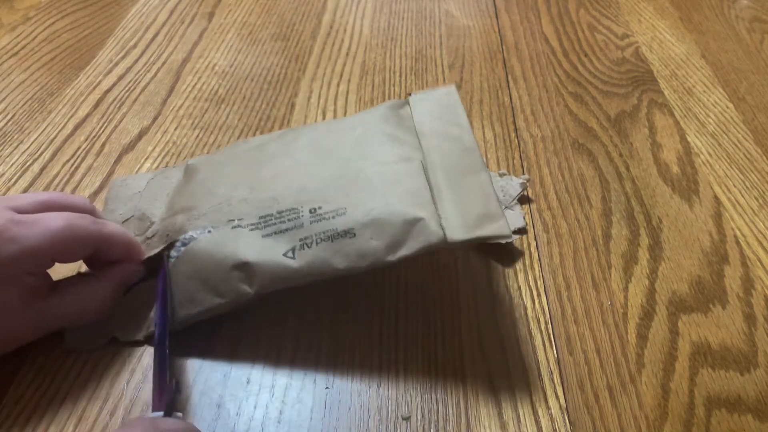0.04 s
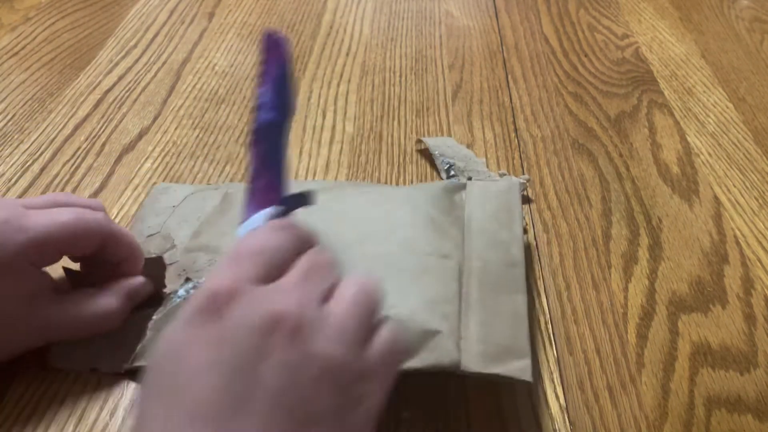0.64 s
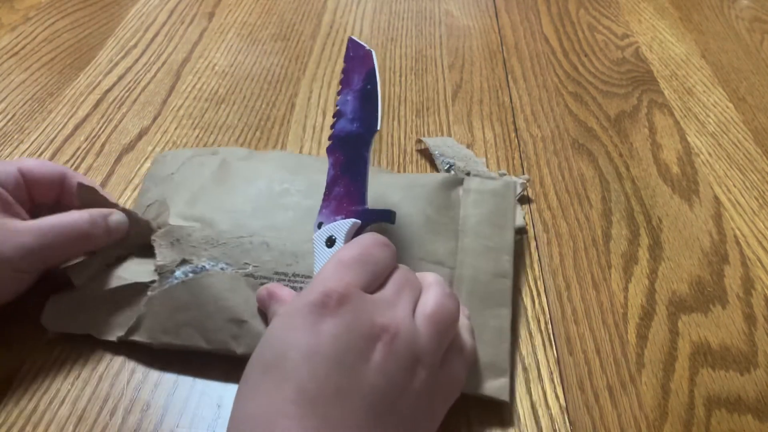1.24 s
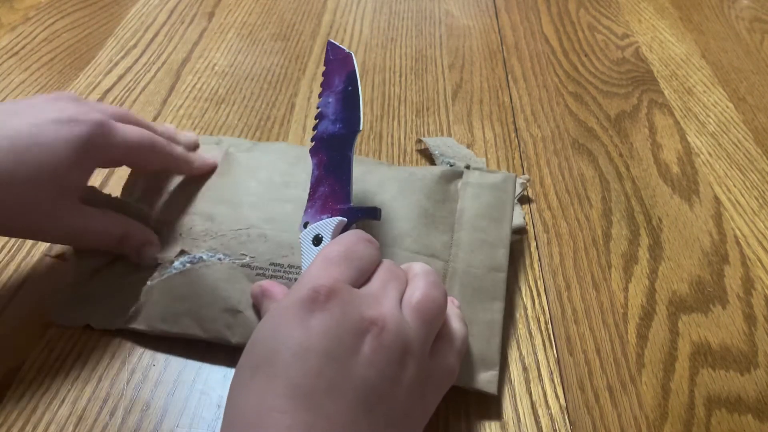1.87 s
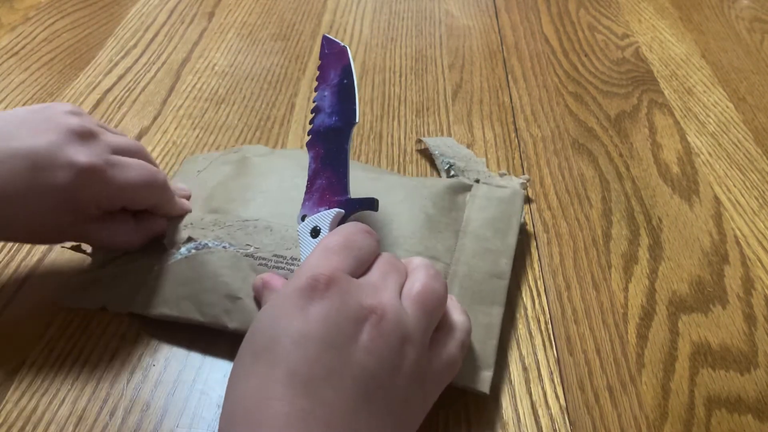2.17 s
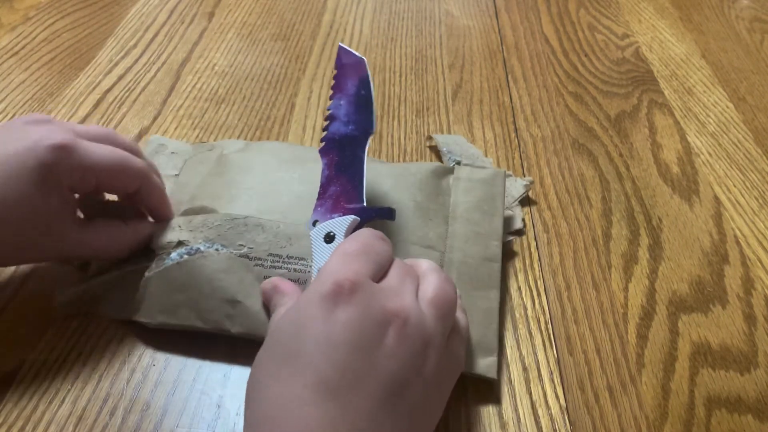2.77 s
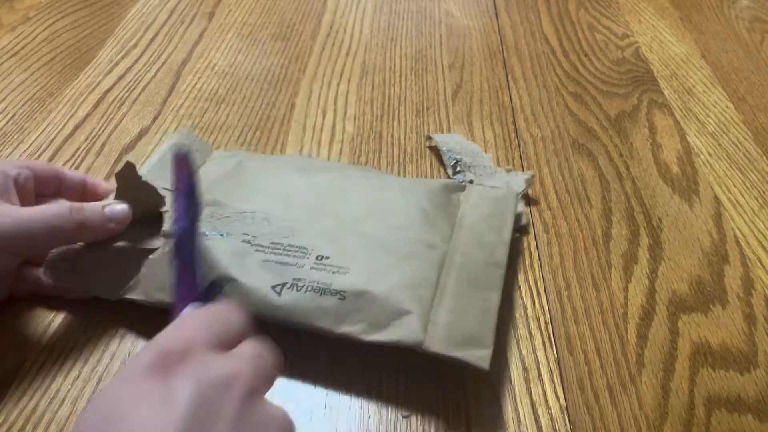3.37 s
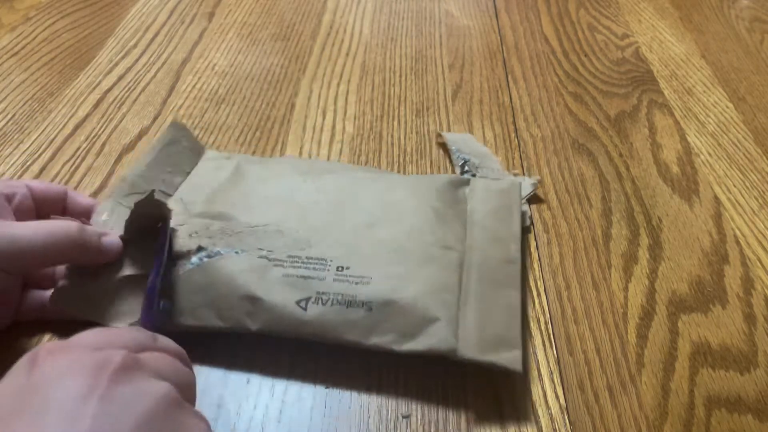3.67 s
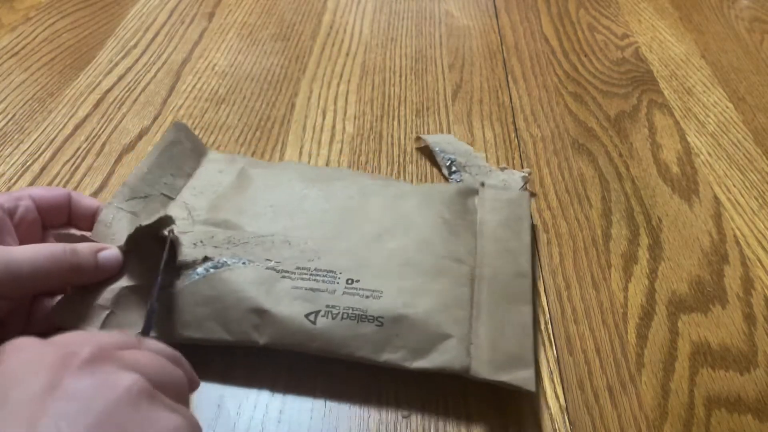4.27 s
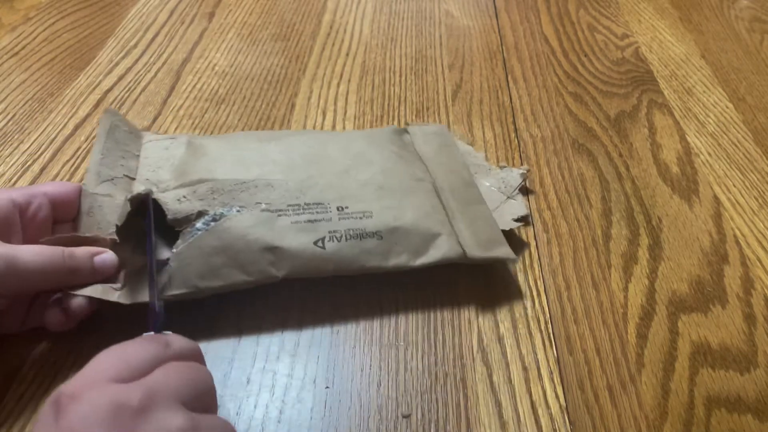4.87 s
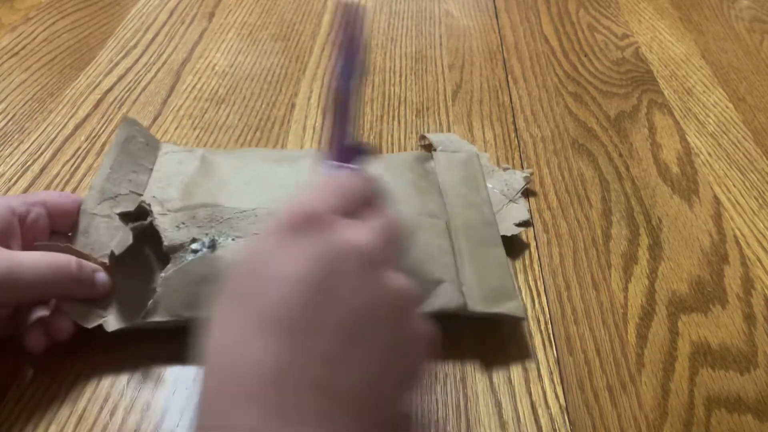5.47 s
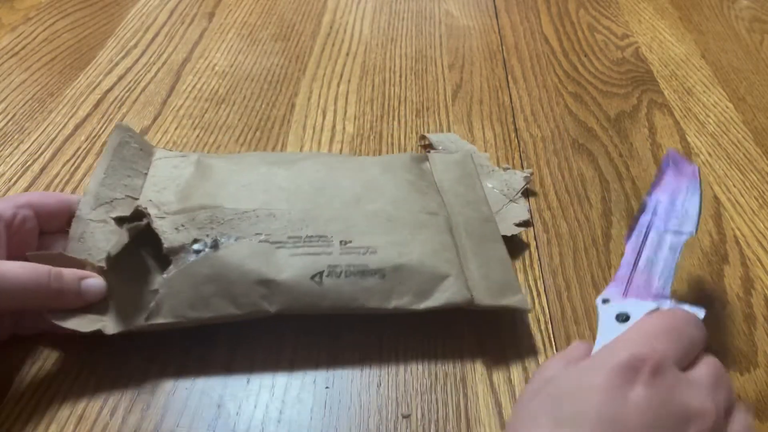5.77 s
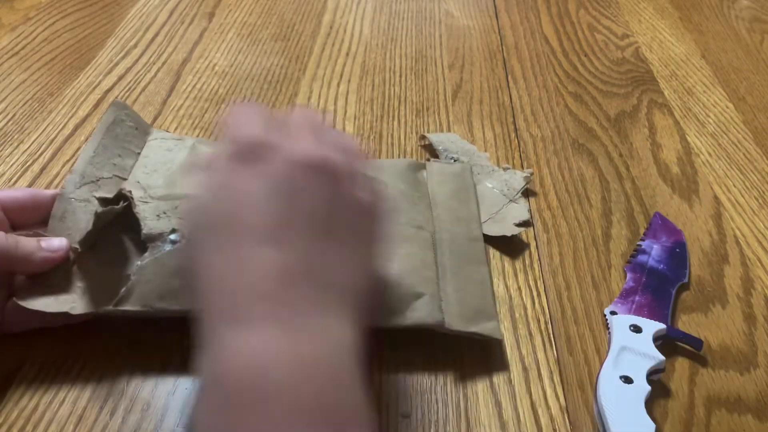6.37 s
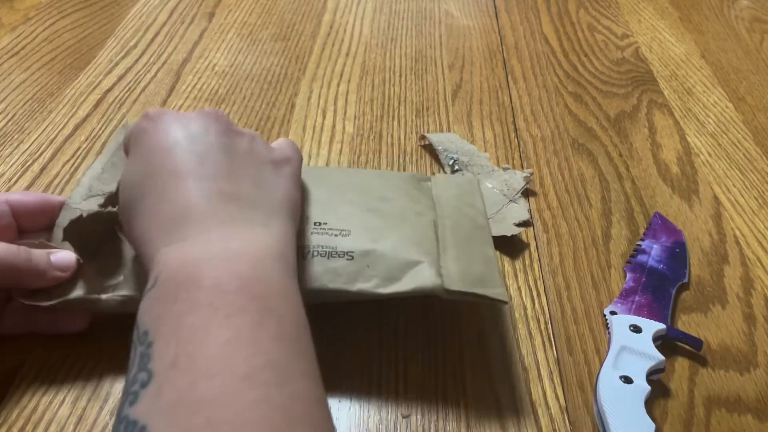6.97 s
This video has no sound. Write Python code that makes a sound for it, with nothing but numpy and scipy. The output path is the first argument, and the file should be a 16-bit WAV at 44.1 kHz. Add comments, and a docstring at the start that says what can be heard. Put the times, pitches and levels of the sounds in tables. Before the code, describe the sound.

Close up in a small room, a padded paper envelope is cut open on a wooden table. A loud, short rip comes first, then several seconds of softer crinkling, sliding and tugging with a few dull bumps. The paper rips sharply again. A steel knife knocks and clinks down onto the wood, and light crinkling resumes. A faint low hum runs underneath.

```python
"""A padded paper mailer is cut open and handled on a wooden table, close up in a small room.
A knife rips its corner and fingers rub and tug at it: fibres hiss and break, the sheet flexes,
and stiff creases buckle with little falling pops. The knife is then laid down with a clatter
that rings the wood and the steel, and the hands return to the paper. A low hum runs throughout."""
import sys
import numpy as np
from scipy import signal
from scipy.fft import rfft, irfft
from scipy.io import wavfile
from scipy.ndimage import uniform_filter1d

SR = 44100
rng = np.random.default_rng(int(sys.argv[2]) if len(sys.argv) > 2 else 0)


def master_out(mix):
    """Clip the mix to full scale and print it as 16-bit PCM to the path in sys.argv[1]."""
    frames = np.transpose(np.atleast_2d(mix))
    ceiling = np.clip(frames, -1, 1)
    pcm = np.round(ceiling * 32767).astype(np.int16)
    wavfile.write(sys.argv[1], SR, pcm)


N = 317961

# The papery body of the flexing sheet. Each row: frequency in Hz, relative level in dB.
FLEX_SPECTRUM = [(40, -9), (120, 0), (280, -0.5), (540, 2), (900, -3.5), (1200, 0.5), (1500, -2.5),
                 (1750, -11), (2450, -8.5), (3200, -20), (6000, -50.5)]
# The bright crack of snapping fibres. Each row: frequency in Hz, relative level in dB.
CRACK_SPECTRUM = [(300, -9), (1300, -2.5), (5000, 2), (12000, -9.5)]


def gain_of(db):
    """Decibels to amplitude."""
    return 10 ** (np.asarray(db) / 20)


def unit_rms(x):
    """Scales a signal to rms 1."""
    return x / np.sqrt(np.mean(x ** 2) + 1e-20)


def curve_at(points, hz):
    """Joins a table's points by straight lines over log frequency."""
    point_hz, value = np.transpose(points)
    return np.interp(np.log(hz + 1), np.log(point_hz + 1), value)


def add(mix, start_s, sound):
    """Drops a sound into the mix at its start time."""
    part = mix[..., max(round(start_s * SR), 0):][..., :sound.shape[-1]]
    part += sound[..., :part.shape[-1]]


def colour(x, spectrum, size=2048):
    """Causal filter with the given spectral shape and unit energy."""
    log_gain = np.log(gain_of(curve_at(spectrum, abs(np.fft.fftfreq(size, 1 / SR)))))
    taps = np.fft.ifft(np.exp(np.conj(signal.hilbert(log_gain)))).real
    return signal.oaconvolve(x, taps[None] / np.linalg.norm(taps), axes=1)[:, :x.shape[1]]


def burst(t60, size=4096):
    """Noise for each microphone port, starting at rms 1 and falling 60 dB in t60 seconds."""
    return rng.standard_normal((2, size)) * gain_of(-60 * np.arange(size) / SR / t60)


def ring(modes, lag_rad=0, softness_db=0):
    """A struck object's modes lead at alternate ports; a soft blow barely wakes the high ones."""
    t, lag = np.arange(SR) / SR, np.array([[lag_rad], [-lag_rad]])
    out = np.zeros((2, SR))
    for k, (hz, db, t60) in enumerate(modes):
        decay = gain_of(db - softness_db * np.sqrt(hz / 1000) - 60 * t / t60)
        out += decay * np.sin(2 * np.pi * hz * t + (-1) ** k * lag)
    return out


def drift(per_s):
    """Smooth random wandering of rms 1."""
    knots = rng.standard_normal(N)
    return unit_rms(np.interp(np.arange(N) * per_s / SR, np.arange(N), knots))


def grains(per_s, spread_db):
    """Random clicks, mostly small and a few large, with a strength for each port."""
    size = gain_of(spread_db * np.minimum(rng.exponential(1, N), 3.5))
    fires = rng.random(N) < per_s / SR
    return unit_rms(size * fires * rng.standard_normal((2, N)))


def splinters(draws, spread_s=0.015, early_share=0.4, splinter_db=-7.5):
    """One main snap with weaker ones scattered around it. Each row: delay in seconds, level in dB."""
    weaker = [(spread_s * (when - early_share), splinter_db * (1 + 2 * size)) for when, size in draws]
    return [(0, 0)] + weaker


def ports(pair):
    """Blends two unrelated signals into what the microphone's two nearby ports hear."""
    # How alike the ports sound. Each row: frequency in Hz, likeness from 0 to 1.
    port_likeness = [(150, 0.85), (700, 0.86), (2400, 0.5), (4500, 0.98)]
    like = np.clip(curve_at(port_likeness, np.fft.rfftfreq(N, 1 / SR)), 0, 1)
    common, apart = rfft(pair) * np.sqrt([(1 + like) / 2, (1 - like) / 2])
    return irfft([common + apart, common - apart], N)


def disperse(x, cycles, knee_hz=120):
    """Bending waves in a sheet: low notes travel slowly, so a click becomes a falling chirp."""
    hz = np.fft.rfftfreq(x.shape[-1], 1 / SR)
    return irfft(rfft(x) * np.exp(-2j * np.pi * cycles * np.log(1 + hz / knee_hz)), x.shape[-1])


def room_tone(hum_hz=59.2, hum_db=-51, waver_db=3.5, floor_db=-64):
    """A low, wavering hum over faint room noise."""
    # The room's dark noise floor. Each row: frequency in Hz, relative level in dB.
    floor_spectrum = [(20, -12), (60, 0), (130, -0.5), (400, -21.5), (1500, -19.5), (16000, -38.5)]
    turns = np.cumsum(hum_hz + drift(9.1)) / SR
    hum = np.sqrt(2) * np.sin(2 * np.pi * turns) * gain_of(hum_db + waver_db * drift(34))
    return hum + gain_of(floor_db) * ports(colour(rng.standard_normal((2, N)), floor_spectrum))


def gesture(length_s, attack_s, fade_db_per_s, sag_db_per_s=0):
    """Envelope of one hand movement: a smooth attack, a hold that may sag, and a fade."""
    t = np.arange(0, length_s + 1, 1 / SR)
    attack = np.sin(np.pi / 2 * np.minimum(t / attack_s, 1)) ** 2
    return attack * gain_of(-sag_db_per_s * t - fade_db_per_s * np.maximum(t - length_s, 0))


def handling():
    """Rips, slides, tugs and grips sum in power to two dB envelopes: sheet flex and fibre hiss."""
    # The paper rips. Each row: start and length in seconds, flex and hiss in dB, fade in dB per second.
    rips = [(0.236, 0.016, -33.5, -30.5, 349), (0.27, 0.059, -29.5, -37.5, 109),
            (0.964, 0.16, -40.5, -38.5, 221.5), (4.934, 0.072, -31.5, -32, 346.5),
            (5.066, 0.108, -30.5, -33, 165)]
    # Fingers or blade slide on the paper. Each row: start and length in seconds, flex and hiss in dB.
    slides = [(0.174, 0.075, -49, -46), (0.767, 0.08, -45, -54), (1.252, 0.04, -36, -30),
              (1.816, 0.2, -51, -51.5), (1.983, 0.069, -45.5, -57), (2.179, 0.12, -48, -57.5),
              (2.303, 0.1, -43, -58.5), (2.53, 0.14, -44.5, -54.5), (2.718, 0.16, -46.5, -55.5),
              (3.086, 0.098, -49.5, -55.5), (3.235, 0.06, -52, -54), (4.293, 0.12, -48, -55),
              (4.495, 0.054, -36, -44.5), (5.659, 0.086, -60.5, -53.5), (5.881, 0.056, -66, -62),
              (6.541, 0.04, -42.5, -43.5), (6.771, 0.049, -37, -43), (6.943, 0.074, -41, -43),
              (7.026, 0.13, -46, -48)]
    # Short tugs and pokes. Each row: start in seconds, flex and hiss in dB.
    tugs = [(1.707, -40, -47.5), (2.124, -49, -50), (3.364, -43.5, -51.5), (3.488, -43, -45.5),
            (3.595, -39, -43), (3.674, -34.5, -41), (3.741, -35, -41), (3.814, -39, -49), (3.978, -42, -52),
            (4.066, -47.5, -49), (4.164, -41.5, -47), (4.254, -47, -50.5), (4.811, -47.5, -49),
            (5.549, -63, -58.5), (6.424, -51, -53)]
    # The gripped mailer rustles faintly. Each row: start and length in seconds, flex and hiss in dB.
    grips = [(0.0, 2.98, -55.5, -60.5), (3.514, 1.86, -57.5, -60.5), (6.53, 0.43, -60, -66)]
    moves = []
    for start_s, length_s, *levels_db, fade in rips:  # the pull eases as the paper gives
        envelope = gesture(length_s, attack_s=0.015, fade_db_per_s=fade, sag_db_per_s=28)
        moves.append((start_s, levels_db, envelope))
    for start_s, length_s, *levels_db in slides:
        swell_s = min(0.98 * length_s, 0.056)
        moves.append((start_s, levels_db, gesture(length_s, swell_s, fade_db_per_s=269)))
    for start_s, *levels_db in tugs:
        moves.append((start_s, levels_db, gesture(length_s=0.023, attack_s=0.004, fade_db_per_s=420)))
    for start_s, length_s, *levels_db in grips:
        moves.append((start_s, levels_db, gesture(length_s, attack_s=0.0086, fade_db_per_s=105)))
    power = np.zeros((2, N))
    for start_s, levels_db, envelope in moves:
        add(power, start_s, np.outer(gain_of(levels_db), envelope) ** 2)
    return 10 * np.log10(power + 1e-12)


def folds(x, depth_db=3, port_depth_db=2, hold_frames=10, size=512, bands=44):
    """The bent sheet favours a shifting set of bands, a little differently towards each port."""
    hz, t, spectra = signal.stft(x, SR, nperseg=size)
    band = np.log(1 + hz / 900) / np.log(1 + hz[-1] / 900) * (bands - 1)
    ripple = uniform_filter1d(rng.standard_normal((3, bands, len(t))), hold_frames, axis=2)
    ripple = unit_rms(uniform_filter1d(ripple[:, np.round(band).astype(int)], 3, axis=1))
    gain = gain_of(depth_db * ripple[0] + port_depth_db * ripple[1:])
    shaped = signal.istft(spectra * gain, SR, nperseg=size)[1]
    return unit_rms(shaped[:, :N])


def strokes(flex_db, hiss_db, tear_db=-40, flex_trim_db=-1, catch_db=2):
    """Light strokes slide with a fine hiss; hard ones break fibres one by one and shake the sheet."""
    # The hiss of rubbed and torn fibres. Each row: frequency in Hz, relative level in dB.
    fibre_spectrum = [(500, -34.5), (1700, -9.5), (2400, -5.5), (3200, -5.5), (4450, 0.7), (6300, -5),
                      (8000, -10), (10000, -8), (13000, -18), (16000, -13.5)]
    tearing = 0.39 + 0.13 * np.tanh((hiss_db - tear_db) / 7)  # the coarse grains' share of the power
    slips, breaks = (np.sqrt(1 - tearing) * grains(14000, 0.32) + np.sqrt(tearing) * grains(1500, 3.5)
                     for _ in range(2))
    catch = gain_of(catch_db * drift(130))  # the paper catches and lets go
    sheet = disperse(colour(slips * catch, FLEX_SPECTRUM), cycles=1.354)
    fibres = colour(breaks * catch, fibre_spectrum)
    body = folds(ports(sheet)) * gain_of(flex_db + flex_trim_db)
    return body + folds(ports(fibres)) * gain_of(hiss_db)


def crinkles(flex_db, hiss_db, per_s=26, tick_boost_db=2, flick_boost_db=3, t60=0.0086, hiss_cap_db=-42):
    """Small creases give way as the sheet is worked: each ticks, up to a limit, and flicks the sheet."""
    clicks = rng.uniform(1, 2.98, N) * (rng.random(N) < per_s / SR)
    decays = signal.lfilter([1], [1, -gain_of(-60 / SR / t60)], clicks)
    snaps = rng.standard_normal((2, N)) * decays
    cracks = colour(snaps * gain_of(np.minimum(hiss_db, hiss_cap_db) + tick_boost_db), CRACK_SPECTRUM)
    flicks = disperse(colour(snaps * gain_of(flex_db + flick_boost_db), FLEX_SPECTRUM), cycles=1.967)
    return ports(cracks + flicks)


def ticks(t60=0.0054, flurry_db=-26, flurry_s=0.018):
    """Clicks too light to shake the sheet, each inside a brief flurry of far fainter ones."""
    # Single thin, dry ticks. Each row: start in seconds, level in dB.
    dry_ticks = [(0.0734, -32), (0.4122, -23), (1.2467, -25), (1.7509, -27), (3.0552, -36), (3.2393, -35),
                 (4.9702, -17), (6.0483, -25.5)]
    out, t = np.zeros((2, N)), np.arange(N) / SR
    flurry = gain_of(flurry_db) * grains(500, 4.5)
    for start_s, db in dry_ticks:
        add(out, start_s, gain_of(db) * burst(t60))
        out += gain_of(db) * flurry * np.exp(-.5 * ((t - start_s) / flurry_s) ** 2)
    return ports(colour(out, CRACK_SPECTRUM))


def pops(width_octaves=0.73, top_hz=1550, echo_db=-12, crack_db=-7, crumple_db=-18, dents_db=3.5):
    """A crease snaps with a ragged crack and a crumple; its bending wave echoes off the edges."""
    # The paper buckles. Each row: start in seconds, pop peak in dB, pop centre in Hz,
    # relative level of the fibre crack in dB.
    buckles = [(0.2506, -20, 700, -17), (0.2617, -15, 706, -7), (0.2824, -6, 705, -6.5),
               (0.2848, -9.5, 470, -20), (0.3185, -18, 964, -34), (0.3255, -13, 1210, -13),
               (0.6338, -29.5, 530, -28.5), (0.7025, -35, 450, -37), (0.7621, -19.5, 890, -36),
               (0.9193, -25, 790, -28.5), (0.975, -32, 1010, -14), (1.0449, -22, 1170, -30),
               (1.1046, -27.5, 674, -24), (1.1735, -28.5, 390, -51), (1.7587, -29, 440, -40),
               (2.017, -28, 1080, -33), (2.3301, -21.5, 664, -31), (2.438, -27.5, 544, -50),
               (2.797, -32, 464, -38), (2.8778, -30, 478, -33.5), (3.3678, -33, 820, -19),
               (3.4878, -31, 1300, -25), (3.656, -28, 564, -45), (3.694, -23.5, 290, -30),
               (3.9843, -22.5, 620, -24), (4.425, -25.5, 875, -69), (4.5601, -19.5, 610, -42),
               (4.6589, -26.5, 650, -18), (4.876, -34, 740, -48), (4.911, -38, 517, -55),
               (4.986, -20, 546, -15), (5.0795, -19, 636, -9.5), (5.099, -16.5, 555, -16),
               (5.1562, -24, 770, -19), (5.1793, -17, 1040, -11), (5.186, -21.5, 1000, -29),
               (6.9225, -26.5, 746, -27), (6.9582, -22.5, 840, -26), (7.0234, -28.5, 623, -23),
               (7.053, -25, 500, -45), (7.1555, -27.5, 388, -32), (7.18, -20.5, 434, -23)]
    chirps, (cracks, crumples) = np.zeros(N), np.zeros((2, 2, N))
    hz = np.fft.rfftfreq(4096, 1 / SR)
    paths, frays = rng.random((len(buckles), 3)), rng.random((len(buckles), 9, 2))
    dents = rng.standard_normal((len(buckles), 20))  # each spot of the sheet has its own resonances
    for buckle, (path, *edges), fray, dent in zip(buckles, paths, frays, dents):
        start_s, peak_db, centre_hz, snap_db = buckle
        # The padding swallows short bending waves; broad creases are duller.
        padding = 1 / np.sqrt(1 + (hz / min(top_hz, 2.1 * centre_hz)) ** 10)
        band = np.exp(-.5 * (np.log2((hz + 1) / centre_hz) / width_octaves) ** 2)
        resonances = gain_of(dents_db * np.interp(hz, np.linspace(0, 2 * top_hz, len(dent)), dent))
        chirp = disperse(irfft(padding * band * resonances), cycles=1.593 + path)
        chirp = chirp / abs(chirp).max() * gain_of(peak_db)
        add(chirps, start_s, chirp)
        for edge in edges:
            add(chirps, start_s + 0.002427 + 0.00722 * edge, chirp * gain_of(echo_db))
        for delay_s, db in splinters(fray):
            snap = burst(0.006) + gain_of(-24) * burst(0.18)
            add(cracks, start_s + delay_s, gain_of(snap_db + crack_db + db) * snap)
        add(crumples, start_s, gain_of(peak_db + crumple_db) * burst(0.14))
    crumpling = disperse(colour(crumples, FLEX_SPECTRUM), cycles=0.942)
    return chirps + ports(colour(cracks, CRACK_SPECTRUM) + crumpling)


def bumps(t60=0.043):
    """Soft, low thuds as the mailer is pushed against the table through its padding."""
    # The pushes. Each row: start in seconds, level in dB, pitch in Hz.
    pushes = [(0.392, -24.5, 100), (0.424, -24, 65), (2.33, -27, 231), (4.556, -29, 112), (5.101, -26, 125)]
    out = np.zeros((2, N))
    for start_s, db, hz in pushes:
        add(out, start_s, ring([(hz, db, t60)]))
    return out


def finger_squeak(centre_s=2.68, width_s=0.027, db=-42):
    """A fingertip squeaks across the paper with a narrow rasp."""
    # The rasp's two close peaks. Each row: frequency in Hz, relative level in dB.
    rasp_spectrum = [(2400, -14), (3500, 2.5), (3900, -1), (4400, 5), (5600, -19)]
    rasp = colour(grains(6600, 1.5), rasp_spectrum)
    swell = np.exp(-.5 * ((np.arange(N) / SR - centre_s) / width_s) ** 2)
    return ports(rasp) * gain_of(db) * swell


def knife_clinks(t60=0.019, shimmer_db=-21, shimmer_t60=0.25, first_gap_s=0.015, gap_ratio=0.66):
    """Steel rattles high above the knocks, then settles in ever faster, fainter bounces."""
    # Bright clinks of the rattling knife. Each row: start in seconds, level in dB.
    clinks = [(6.1085, -29), (6.1402, -28), (6.1502, -31), (6.1598, -20.5), (6.2403, -27), (6.266, -26)]
    # The steely tone of a clink. Each row: frequency in Hz, relative level in dB.
    steel_spectrum = [(3000, -26), (6800, -13), (7900, 0.5), (8800, -10.5), (13900, -10), (16000, -11)]
    last_s, last_db = clinks[-1]
    bounce = np.arange(4)
    bounce_s = last_s + np.cumsum(first_gap_s * gap_ratio ** bounce)
    bounce_db = last_db - 12.5 - 3.5 * bounce
    out = np.zeros((2, N))
    for start_s, db in [*clinks, *zip(bounce_s, bounce_db)]:
        clink = burst(t60, size=SR) + gain_of(shimmer_db) * burst(shimmer_t60, size=SR)
        add(out, start_s, gain_of(db) * clink)
    return ports(colour(out, steel_spectrum))


def knife_landing(knock_db=-4, contact_db=-5, wood_db=-9, blade_db=-9, soft_share=0.87):
    """Each contact chatters and rings table and blade; softer ones ring mainly the blade's low modes."""
    # The knife lands and rocks to rest. Each row: start in seconds, then the relative levels in dB
    # of the blow on the wood and of the hard contact.
    landings = [(6.1107, -18, -18.5), (6.119, -6, -4), (6.1215, -7, -8), (6.1507, -7.5, -20),
                (6.163, -19, -18), (6.183, -11, -19), (6.2049, -14, -16.5), (6.2282, -6, -26),
                (6.241, -17, -21), (6.256, -12, -25), (6.2646, -13, -27.5), (6.277, -13, -26.5)]
    # Modes of the table top and of the blade. Each row: frequency in Hz, level in dB, t60 in seconds.
    wood_modes = [(83.4, -25, 0.6), (150, -15.5, 0.25), (281, -15, 0.17), (505, -11, 0.14),
                  (605, -13, 0.15), (652, -10.5, 0.16), (745, -7, 0.1), (892, -8, 0.11)]
    blade_modes = [(1447, -15, 0.36), (1580, -22, 0.33), (2655, -18, 0.24), (3351, -16, 0.42),
                   (4612, -11.5, 0.17), (5475, -27, 0.3), (6204, -16, 0.25)]
    # The dull knock and the hard contact's clack. Each row: frequency in Hz, relative level in dB.
    knock_spectrum = [(35, -28), (95, -1), (250, -13.5), (500, 0.5), (900, 1), (1300, -9.5), (14000, -51)]
    contact_spectrum = [(200, -19), (1000, 4), (2300, 2), (6000, -11.5), (16000, -38)]
    knocks, contacts, rings = np.zeros((3, 2, N))
    wood = ring(wood_modes, lag_rad=0.43)
    hardest_db = max(hard_db for _, _, hard_db in landings)
    for (start_s, blow_db, hard_db), chatter in zip(landings, rng.random((len(landings), 2, 2))):
        knock = burst(0.018) + gain_of(-8) * burst(0.11)
        add(knocks, start_s, gain_of(blow_db + knock_db) * knock)
        for delay_s, db in splinters(chatter):
            clack = burst(0.0092) + gain_of(-10) * burst(0.11)
            add(contacts, start_s + delay_s, gain_of(hard_db + contact_db + db) * clack)
        blade = ring(blade_modes, lag_rad=0.62, softness_db=soft_share * (hardest_db - hard_db))
        add(rings, start_s, gain_of(blow_db + wood_db) * wood + gain_of(blade_db) * blade)
    return ports(colour(knocks, knock_spectrum) + colour(contacts, contact_spectrum)) + rings


def place(x, leftward):
    """The direct path to the two ports: the nearer one hears a source louder and shifted in phase."""
    # The microphone's own phase offset, left port over right. Each row: frequency in Hz, radians.
    port_lead = [(6300, -0.1), (7500, -3), (9000, -3.6), (10200, -6.1), (12700, -6.7), (14000, -9.3)]
    # The nearer port's added phase lead. Each row: frequency in Hz, lead in radians.
    near_lead = [(100, -0.43), (1500, 0.9), (2300, 1.58), (3700, 1.06), (5200, 0.22)]
    # The nearer port's level over the farther. Each row: frequency in Hz, gain in dB.
    near_gain = [(150, 0), (550, 3), (2900, 3.5), (8000, 0.2)]
    hz = np.fft.rfftfreq(N, 1 / SR)
    lead_rad = curve_at(port_lead, hz) + leftward * curve_at(near_lead, hz)
    left_db = leftward * curve_at(near_gain, hz)
    response = gain_of([left_db / 2, -left_db / 2]) * np.exp(.5j * np.array([lead_rad, -lead_rad]))
    return irfft(rfft(x) * response, N)


def room_reverb(x, predelay_s=0.0023, port_spacing_s=0.00081, size=256):
    """A diffuse tail, each band dying at its own speed; long waves reach both ports alike."""
    # The small room's decay. Each row: frequency in Hz, t60 in seconds.
    decay_times = [(100, 0.42), (2000, 0.45), (14000, 0.15)]
    hz, t, (left, unrelated) = signal.stft(rng.standard_normal((2, SR)), SR, nperseg=size)
    like = np.sinc(2 * hz * port_spacing_s)[:, None]
    right = like * left + np.sqrt(1 - like ** 2) * unrelated
    decay = gain_of(-60 * t / curve_at(decay_times, hz)[:, None])
    tail = signal.istft(np.array([left, right]) * decay, SR, nperseg=size)[1]
    tail *= np.clip(np.arange(tail.shape[1]) / SR / predelay_s - 1, 0, 1)
    return signal.fftconvolve(x, tail / np.linalg.norm(tail[0]), axes=1)[:, :N]


def scene(knife_leftward=-0.33, paper_send_db=-15, knife_send_db=-10):
    """Paper to the left, knife a little to the right, both in the same small room."""
    flex_db, hiss_db = handling()
    paper = strokes(flex_db, hiss_db) + pops() + ticks() + crinkles(flex_db, hiss_db) + finger_squeak()
    clatter = knife_landing() + knife_clinks()
    direct = place(paper, leftward=1) + place(clatter, knife_leftward)
    reverb = room_reverb(gain_of(paper_send_db) * paper + gain_of(knife_send_db) * clatter)
    return direct + reverb + bumps() + room_tone()


def record(dry, low_cut_hz=45, high_cut_hz=14000, band_limit_hz=16300):
    """The microphone sheds the deepest bass and the highest treble; a steep band limit follows."""
    low_cut = signal.butter(4, low_cut_hz, "highpass", fs=SR, output="sos")
    high_cut = signal.butter(3, high_cut_hz, fs=SR, output="sos")
    heard = signal.sosfilt(np.vstack([low_cut, high_cut]), dry)
    band_limit = signal.firwin(511, band_limit_hz, window=("kaiser", 9), fs=SR)
    return signal.oaconvolve(heard, band_limit[None], "same")


dry = scene()
out = record(dry)
master_out(out)
```